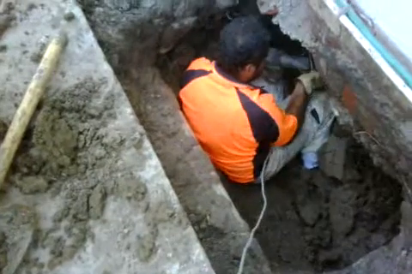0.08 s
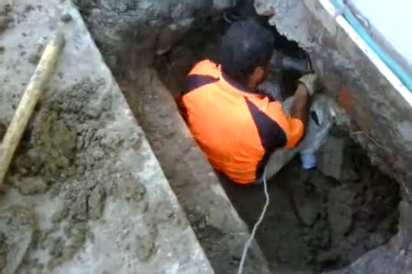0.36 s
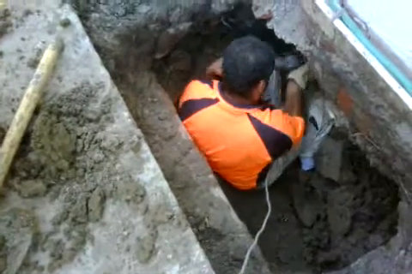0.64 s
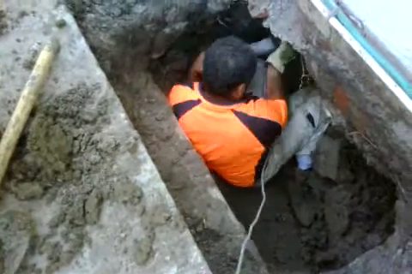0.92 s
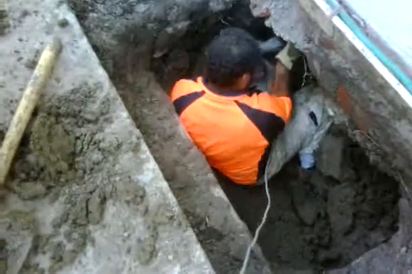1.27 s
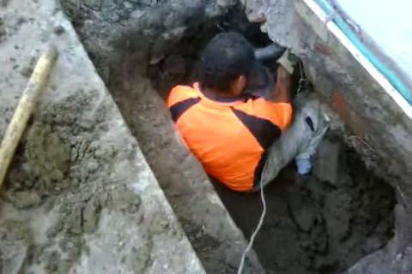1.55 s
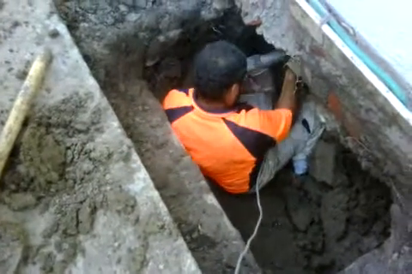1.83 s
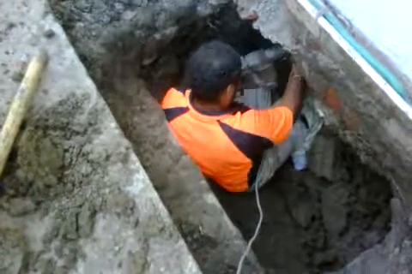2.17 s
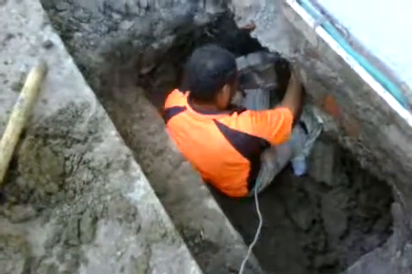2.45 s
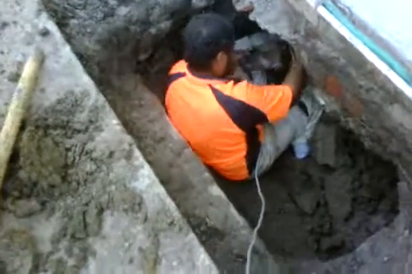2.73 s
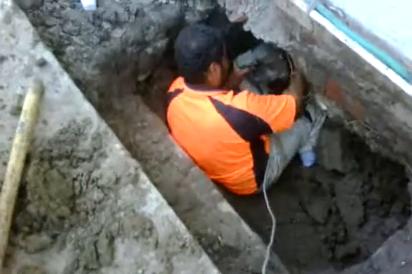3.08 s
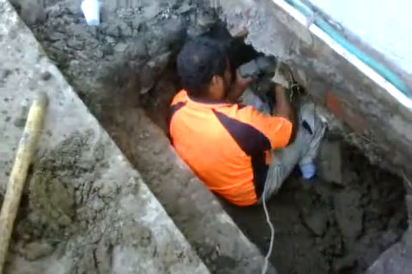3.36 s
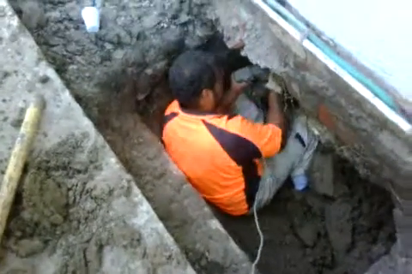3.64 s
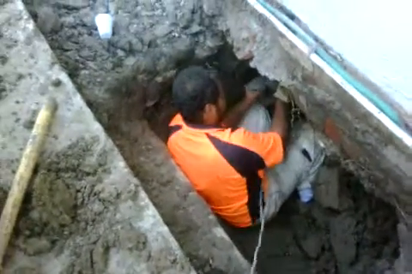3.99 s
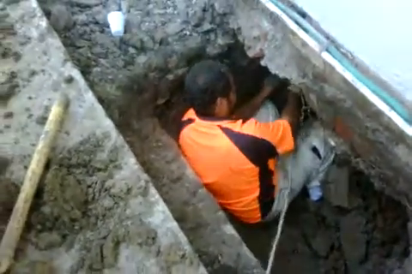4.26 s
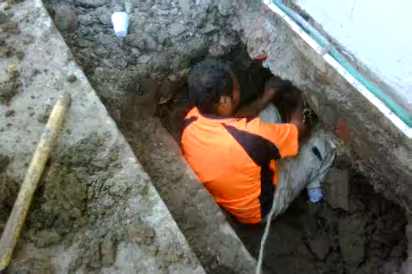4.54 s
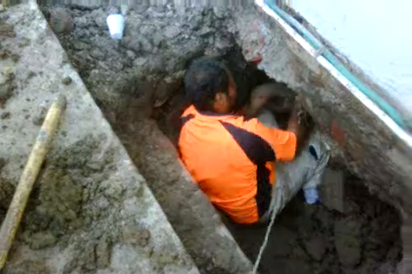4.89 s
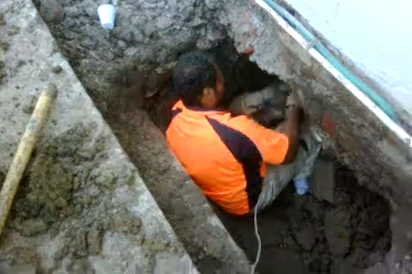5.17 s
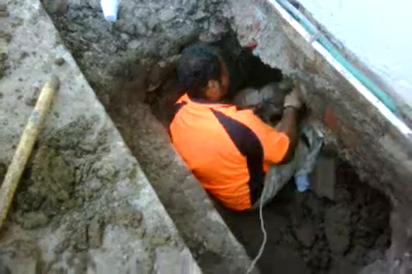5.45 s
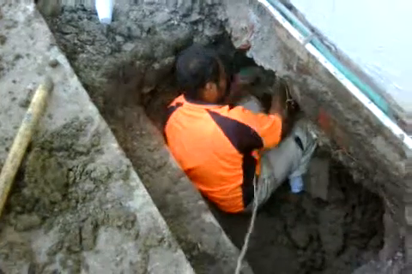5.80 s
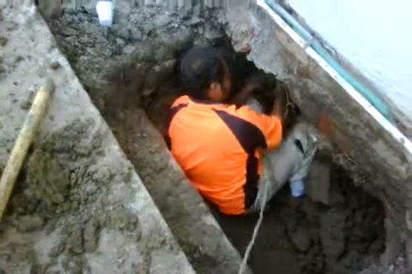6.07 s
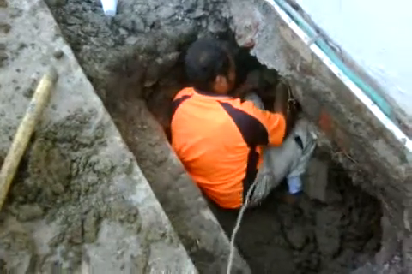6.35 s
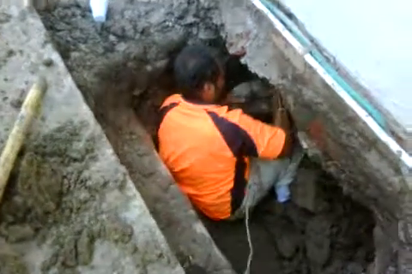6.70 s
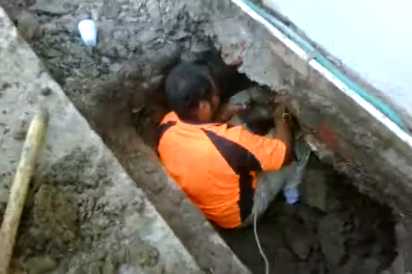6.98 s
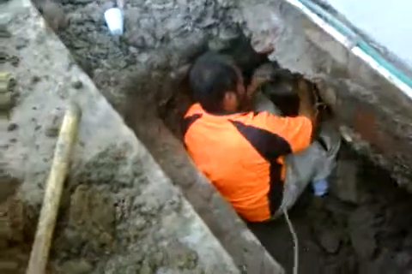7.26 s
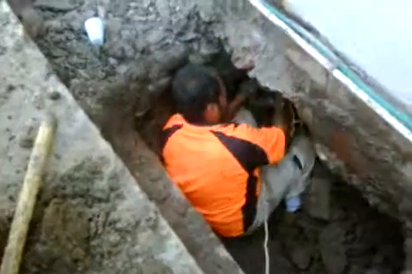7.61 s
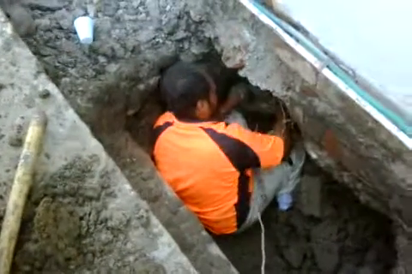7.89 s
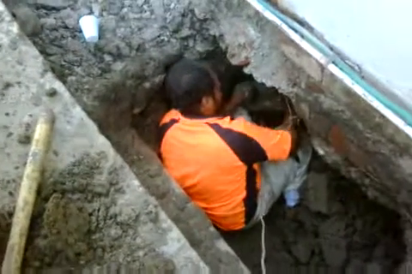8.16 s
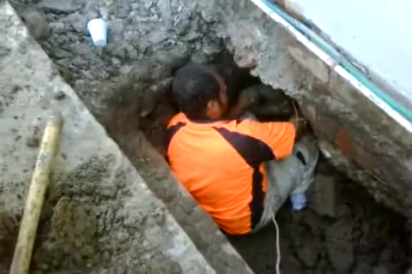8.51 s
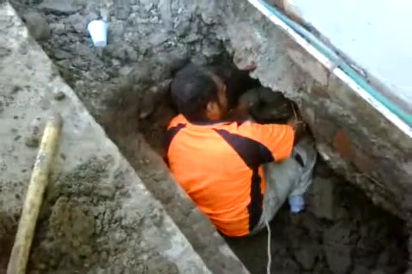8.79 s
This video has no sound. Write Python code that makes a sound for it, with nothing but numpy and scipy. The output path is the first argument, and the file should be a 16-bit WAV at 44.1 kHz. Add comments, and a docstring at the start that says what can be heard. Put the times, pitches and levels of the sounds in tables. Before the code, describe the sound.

An electric breaker's motor winds down and its loose chisel clanks and scrapes in bursts, before rapid, continuous hammering chips away stone.

```python
"""A corded breaker hammer pounds masonry in a narrow pit, heard from above.
First its motor whines and runs down, the chisel is shifted with a clatter, then it skitters over the
stone in short bursts. After another run-down and more clatter the worker leans in: the striker, a
weight inside the tool, hits about 22 times a second, ringing the chisel and crumbling the stone."""
import sys
import numpy as np
from scipy import signal
from scipy.fft import rfft, irfft
from scipy.io import wavfile
from scipy.ndimage import uniform_filter1d

SR = 44100
rng = np.random.default_rng(int(sys.argv[2]) if len(sys.argv) > 2 else 0)


def bounce(signal):
    """Save signal as a 16-bit WAV file at the path given by the first command-line argument."""
    frames = np.transpose(np.atleast_2d(signal))
    limited = np.clip(frames, -1, 1)
    pcm = np.round(limited * 32767).astype(np.int16)
    wavfile.write(sys.argv[1], SR, pcm)


N = 399105
TIME = np.arange(N) / SR

# pushes on the loose chisel: hardest moment t/s, level/dB, swell/s, fade/s, clack rate/Hz, bass/dB
PUSHES = [(1.591, -13, 0.052, 0.072, 35.4, -15.5), (1.774, -16, 0.059, 0.049, 54, -15),
          (1.874, -23.5, 0.043, 0.061, 50, -10), (1.9981, -14, 0.074, 0.063, 48, -19.5),
          (2.131, -14.5, 0.047, 0.056, 44.5, -16.5), (2.215, -24.5, 0.038, 0.093, 65, -5),
          (2.337, -14.5, 0.087, 0.064, 54.5, -17), (2.541, -14.5, 0.051, 0.048, 56, -19),
          (2.7455, -15, 0.062, 0.079, 54.6, -17), (2.922, -17, 0.033, 0.047, 46, -19),
          (3.1025, -15.5, .045, 0.028, 57, -18), (3.274, -15.5, 0.052, 0.084, 50, -13.5),
          (3.5532, -16.5, 0.1, 0.014, 46.5, -12.5)]


def amp(db):
    """Turns decibels into a gain."""
    return 10 ** (np.asarray(db) / 20)


def evened(x):
    """Scales a signal to an average power of one."""
    return x / np.sqrt(np.mean(x ** 2) + 1e-20)


def curve(rows, **ends):
    """Joins (time, value) points with straight lines."""
    return np.interp(TIME, *np.transpose(rows), **ends)


def drift(hz):
    """A smooth random wobble; a higher hz makes it quicker."""
    keep_slow = np.exp(-(np.fft.rfftfreq(N, 1 / SR) / hz) ** 2)
    return evened(irfft(rfft(rng.standard_normal(N)) * keep_slow, N))


def colour(x, spectrum, modes=(), size=8192):
    """Gives a sound a broad tone colour plus modes, the pitches at which an object likes to ring."""
    hz = np.fft.rfftfreq(size, 1 / SR) + 1
    f, db = np.transpose(spectrum)
    power = evened(amp(np.interp(np.log(hz), np.log(f), db))) ** 2
    for centre, width, mode_db in modes:
        power += evened(1 / (1 + ((hz - centre) / width) ** 2)) ** 2 * amp(mode_db) ** 2
    log_gain = np.log(evened(np.sqrt(power)) + 1e-5)
    mirrored = np.concatenate([log_gain, log_gain[-2:0:-1]])
    response = np.exp(np.conj(signal.hilbert(mirrored)))  # rings after a hit, never before it
    taps = np.fft.ifft(response).real[:size // 2]
    return signal.oaconvolve(x, taps)[:N]


def shifting(x, depth_db, width_hz, hold_s, size=1024):
    """Random bands of pitch swell and sink, as when a wandering contact wakes different resonances."""
    frames = dict(nperseg=size, noverlap=size * 3 // 4)
    hz, t, spectra = signal.stft(x, SR, **frames)
    across, along = np.fft.fftfreq(len(hz), hz[1])[:, None], np.fft.fftfreq(len(t), t[1])
    smooth = np.exp(-(across * width_hz) ** 2 - (along * hold_s) ** 2)
    patches = evened(np.fft.ifft2(np.fft.fft2(rng.standard_normal(spectra.shape)) * smooth).real)
    gain = evened(amp(depth_db * np.clip(patches, -2, 2)))
    return signal.istft(spectra * gain, SR, **frames)[1][:N]


def hit_shape(t, rise_s, decay_s):
    """The loudness of one hit: it swells quickly and dies away."""
    return (1 - np.exp(-t / rise_s)) * np.exp(-t / decay_s)


def strikes(times, levels_db, decays, rise_s):
    """One burst of noise for each hit."""
    power, t = np.zeros(N), TIME[:SR // 2]
    for start, db, decay in zip(times, levels_db, np.broadcast_to(decays, len(times))):
        part = power[round(start * SR):][:len(t)]
        part += (amp(db) * hit_shape(t[:len(part)], rise_s, decay)) ** 2
    return np.sqrt(power) * rng.standard_normal(N)


def outdoor_air():
    """A faint, steady hush."""
    tone = [(20, -22), (60, -9), (200, -3.5), (700, 7), (2000, 0), (4400, -13)]  # colour of the air: f/Hz, level/dB
    return amp(-56.5) * colour(rng.standard_normal(N), tone)


def motor(spin_up_s=.09, whirr_db_per_octave=11, whine_db_per_octave=22.5):
    """Gears whine and the casing whirrs; both grow with the motor's speed and sink as it coasts."""
    # motor whine and whirr: swells from t/s, starts sinking t/s, top gear f/Hz, slowing/(Hz per s),
    # whirr/dB, whine/dB
    swells = [(-1, .42, 2850, 1550, -38.5, -39), (2.55, 3.9, 2400, 640, -35.5, -42.5),
              (7.5, 9.5, 3500, 900, -36.5, -60.5)]
    casing = [(35, -83), (60, -50.5), (220, -34), (500, -37), (754, -21.5), (796, -21), (934, -24),
              (1570, -16), (1910, -4), (2240, -9), (2530, -10), (2820, -20), (3030, -20.5), (3560, -18.5),
              (4250, -50.5), (5520, -78.5), (9350, -120)]  # colour of the casing: f/Hz, level/dB
    casing_modes = [(1387, 64, -13.5), (1940, 510, -3), (2580, 85, -8.5)]  # its resonances: f/Hz, width/Hz, level/dB
    pitch, whirr_db, whine_db = np.zeros((3, N))
    for swell_at, sink_at, top_hz, slowing, top_whirr_db, top_whine_db in swells:
        now = TIME >= swell_at
        t, start_hz = TIME[now], pitch[now][0]
        rising_hz = top_hz + (start_hz - top_hz) * np.exp((swell_at - t) / spin_up_s)
        pitch[now] = rising_hz - slowing * np.maximum(t - sink_at, 0)
        octaves = np.log2(np.maximum(pitch[now], 1) / top_hz)
        whirr_db[now] = top_whirr_db + whirr_db_per_octave * octaves
        whine_db[now] = top_whine_db + whine_db_per_octave * octaves
    cycles = np.cumsum(pitch * (1 + .012 * drift(150))) / SR
    flutter = .8 + .55 * drift(60)
    whine = np.sin(2 * np.pi * cycles) * flutter * amp(whine_db)
    whirr = rng.standard_normal(N) * amp(whirr_db + 2 * drift(250) + drift(12))
    return whine + shifting(colour(whirr, casing, casing_modes), depth_db=3.8, width_hz=250, hold_s=.08)


def clatter(stroke_s=.046, stroke_db=-12.5, rise_s=.0035):
    """As the tool is shifted, steel clanks on stone and the body bumps the soil."""
    # each contact: t/s, clank/dB, thud/dB, decay/s, ring f/Hz, ring/dB
    contacts = [(.545, -33.5, -44.5, .08, 1380, -42), (.591, -23.5, -32, 0.066, 2660, -31.5),
                (.634, -20.5, -39.5, .05, 1890, -27), (.7, -41, -32, 0.24, 473, -38),
                (.762, -21, -24.5, 0.026, 1113, -29), (.817, -20.5, -31, 0.02, 1480, -26.5),
                (.86, -28.5, -36, 0.033, 227, -30.5), (.926, -24, -32, 0.017, 1316, -17.5),
                (.935, -11.5, -40.5, 0.022, 1533, -21), (1.015, -19, -47, 0.02, 2640, -21),
                (1.103, -32.5, -56, 0.038, 2550, -33), (1.2, -41, -60, 0.037, 224, -46.5),
                (3.64, -37, -29.5, 0.019, 1446, -26.5), (3.712, -28.5, -43.5, 0.015, 1382, -24),
                (4.137, -17.5, -35, 0.043, 1840, -19), (4.152, -21.5, -36, 0.014, 2520, -17),
                (4.33, -37, -36, 0.03, 212, -35.5), (4.44, -45, -38, 0.013, 1390, -48),
                (4.875, -51.5, -47, 0.094, 1920, -34), (4.975, -34.5, -51, 0.036, 1730, -35)]
    clank_tone = [(290, -47.5), (500, -7), (587, -25), (768, -8.5), (1080, -10.5), (1160, -14), (1290, -14),
                  (1410, -5), (1500, -28), (1620, -3), (2250, -2.5), (2510, 0), (3190, -11), (3720, -12.5),
                  (4250, -30.5), (5520, -44.5), (9350, -120)]  # steel on stone: f/Hz, level/dB
    chisel_modes = [(1320, 210, -21), (1510, 110, -18.5), (1890, 81, -12), (2180, 53, -8), (2433, 22, -10),
                    (3130, 77, -24)]  # chisel resonances: f/Hz, width/Hz, level/dB
    thud_tone = [(18, -47.5), (30, -26), (113, -10.5), (210, -2), (502, -3), (611, 0.5), (743, -5),
                 (932, -10), (1100, 3), (1430, -24), (2420, -120)]  # body on soil: f/Hz, level/dB
    stroke_step = np.array([stroke_s, stroke_db, stroke_db, 0, 0, stroke_db])
    repeated = np.vstack([contacts + k * stroke_step for k in range(4)])  # a hit and three weaker repeats as the idle striker clatters at its stroke rate
    times, clank_db, thud_db, decays, ring_hz, ring_db = repeated.T
    clank = strikes(times, clank_db, decays, rise_s) * amp(2 * drift(300))
    thud = strikes(times, thud_db, decays, rise_s)
    ring, t = np.zeros(N), TIME[:SR // 4]
    ring_shape = hit_shape(t, rise_s=.00059, decay_s=.03)
    for start, hz, db in zip(times, ring_hz, ring_db):
        ring[round(start * SR):][:len(t)] += amp(db) * ring_shape * np.sin(2 * np.pi * hz * t)
    ring *= 1 + .8 * drift(120)
    return colour(clank, clank_tone, chisel_modes) + colour(thud, thud_tone) + ring


def push(t, swell, fade):
    """One push on the tool: a flat-topped bell shape, hardest at t = 0."""
    return np.exp(-abs(t / np.where(t < 0, swell, fade)) ** 2.6)


def clacking(uneven_db=5):
    """The loose chisel clacks in its holder at an even pace, about as hard as it is pushed."""
    times, levels_db = [], []
    for peak, db, swell, fade, rate, _ in PUSHES:
        t = np.arange(-4, 5) / rate
        push_db = db + 20 * np.log10(push(t, swell, fade) + 1e-6)
        times.extend(peak + t)
        levels_db.extend(push_db - uneven_db * rng.random(len(t)) ** 2)
    return strikes(times, levels_db, decays=.006, rise_s=.00098)


def skitter(buzz_hz=50):
    """The unloaded chisel scrapes and buzzes over the stone, clacking with each push."""
    slide_levels = [(1.365, -59), (1.395, -25.5), (1.5, -18.5), (2.25, -23), (2.45, -29), (3.2, -24),
                    (3.6, -27), (3.85, -31.5), (4.12, -35)]  # the tip sliding lightly: t/s, level/dB
    steel_tone = [(410, -41.5), (700, -24), (858, -36.5), (968, -10.5), (1050, -5.5), (1350, -0.5),
                  (1500, -3), (1670, 0), (2060, 2.5), (2580, -1), (3100, -11.5), (3490, -13), (4250, -37),
                  (5520, -60), (9350, -120)]  # scraped steel: f/Hz, level/dB
    steel_modes = [(2586, 24, -16.5)]  # the sliding chisel sings: f/Hz, width/Hz, level/dB
    stone_tone = [(18, -49), (30, -29), (117, -19), (214, -19), (427, -13.5), (598, -9), (851, -2.5),
                  (1000, -0.5), (1300, -14.5), (2200, -120)]  # the low part of the scrape: f/Hz, level/dB
    hit_times = [1.633, 2.019, 2.340, 2.748, 3.103, 3.552]  # sharp, head-on hits of steel on steel: t/s
    sliding = amp(curve(slide_levels, left=-120, right=-120))
    push_power = np.array([amp(db) * push(TIME - peak, swell, fade)
                           for peak, db, swell, fade, _, _ in PUSHES]) ** 2
    force = np.sqrt(sliding ** 2 + push_power.sum(0))
    bass_shares = amp(np.transpose(PUSHES)[-1]) ** 2
    bass = np.sqrt((sliding * amp(-22)) ** 2 + bass_shares @ push_power)
    cycles = np.cumsum(buzz_hz * (1 + .051 * drift(7.1))) / SR
    buzz = 1 + .1 * np.cos(2 * np.pi * cycles)
    scrape = amp(-3.5 + 2.5 * drift(430)) * buzz * rng.standard_normal(N)
    clacks = clacking() * amp(9)
    steel = colour(scrape * force + clacks, steel_tone, steel_modes)
    steel = shifting(steel, depth_db=3.5, width_hz=160, hold_s=.046)
    stone = colour(scrape * bass + amp(-14) * clacks, stone_tone)
    clicks = np.bincount(np.round(np.array(hit_times) * SR).astype(int), minlength=N)
    return steel + stone + colour(clicks * amp(13), steel_tone)


def chips(width_hz=600):
    """Each big flake of stone snaps off with a short burst of noise around its own pitch."""
    flakes = [(5.377, -17, 2000, 0.0087), (5.575, -16, 1910, 0.0083), (5.618, -33, 1900, 0.01),
              (5.668, -25, 2000, 0.01), (6.135, -22, 2840, 0.046), (6.221, -26, 1630, .008),
              (6.368, -23, 2900, 0.0088), (6.634, -19, 1530, 0.0065), (7.04, -29.5, 3190, 0.045),
              (8.203, -19, 1440, .014), (8.382, -22.5, 2280, 0.018), (8.565, -23, 2300, 0.015),
              (8.92, -24, 2170, .012)]  # flakes cracking off: t/s, level/dB, f/Hz, decay/s
    snaps, t = np.zeros(N), TIME[:SR // 9]
    pole = np.exp(-np.pi * width_hz / SR)
    for start, db, hz, decay in flakes:
        band = [1, 0, -1, 1, -2 * pole * np.cos(2 * np.pi * hz / SR), pole ** 2]
        snap = evened(signal.sosfilt([band, band], rng.standard_normal(len(t))))
        snaps[round(start * SR):][:len(t)] += amp(db) * snap * hit_shape(t, .0022, decay)
    return snaps


def blows(age, period, decay, alike, lead_s, rattle):
    """Blows repeat a slowly changing pattern of pit echoes (the share `alike`), plus fresh debris."""
    patterns = rng.standard_normal((3, SR))[:, np.minimum(age * SR, SR - 1).astype(int)]
    weights = np.array([drift(1.7) for _ in patterns])
    echoes = (patterns * weights).sum(0) / np.linalg.norm(weights, axis=0)
    # the sound swells as the striker flies in, dies after the blow, and never stops rattling
    shape = np.maximum(np.exp((age - period) / lead_s), np.exp(-age / decay)) + rattle
    shape /= np.sqrt(uniform_filter1d(shape ** 2, size=8000) + 1e-9)
    return shape * (np.sqrt(alike) * echoes + np.sqrt(1 - alike) * rng.standard_normal(N))


def crumbling(crunch, force_db):
    """Stone breaks into grit under the tip; grinding needs both force and loose stone."""
    amount = [(5.26, -32.5), (5.4, -25.5), (5.6, -22.5), (5.85, -23), (5.98, -29.5), (6.3, -27.5),
              (6.7, -32.5), (7.06, -29), (7.2, -31), (8.1, -36.5), (8.4, -32.5), (8.6, -34.5),
              (9.05, -33.5)]  # how much stone crumbles: t/s, level/dB
    grind_tone = [(800, -32.5), (1150, -1), (1350, -1.5), (1580, 3), (1780, 1), (2200, -37)]  # stone being ground: f/Hz, level/dB
    grit_tone = [(1030, -28), (1750, 0.5), (1850, 0.5), (2080, 2), (2200, 0.5), (2440, -2.5), (3310, -12),
                 (3830, -21.5), (4250, -43), (5520, -72.5), (9350, -120)]  # loose grit: f/Hz, level/dB
    grit_db = curve(amount)
    grind = colour(crunch * amp((force_db + grit_db) / 2 - 3), grind_tone)
    grit = colour(crunch * amp(grit_db), grit_tone)
    return shifting(grind + grit, depth_db=4, width_hz=80, hold_s=.041)


def hammer(loose_decay_s=.09, firm_decay_s=.01, knock_hz=915, knock_s=.0045, uneven_db=1.26):
    """The striker drives the ringing chisel into the wall; as the tip beds in, blows stand apart."""
    pace = [(5.261, 16.33), (5.6, 22.31), (5.8, 19.9), (6.2, 23.37), (6.7, 20.28), (6.8, 22.15),
            (6.9, 20.18), (7.3, 22.08), (7.7, 21.47), (7.8, 23.46), (7.9, 21.71), (9.05, 23.06)]  # steady hammering: t/s, blow rate/Hz
    # stumbling thumps before and just as the hammering starts: t/s, level/dB, decay/s
    stumbles = [(4.937, -23, 0.029), (4.959, -27, 0.03), (5.18, -26.5, 0.053), (5.227, -30, 0.044),
                (5.318, -12.5, 0.012), (5.379, -19, 0.077)]
    wall_force = [(5.26, -25.5), (5.41, -19), (5.51, -22), (5.6, -18), (5.82, -18), (6.05, -20.5),
                  (6.29, -16.5), (6.72, -20.5), (6.96, -21.5), (7.05, -18), (7.15, -21.5), (7.38, -20),
                  (7.7, -24.5), (8.02, -27.5), (8.14, -22.5), (8.3, -30.5), (9.05, -30)]  # how hard blows reach the wall: t/s, level/dB
    bedding = [(5.26, 0.21), (5.9, .03), (6.5, 0.25), (7.0, 0.44), (7.25, 0.69), (7.7, 0.46), (8.25, 0.61),
               (9.05, 0.53)]  # how firmly the tip sits: t/s, firmness (0 loose, 1 firm)
    body_tone = [(25, -34), (70, -11.5), (150, -9), (225, -4), (300, -2.5), (450, -1), (800, -23),
                 (1500, -69.5)]  # the shaking tool: f/Hz, level/dB
    ring_tone = [(450, -36), (650, -29.5), (800, -6.5), (900, 6), (980, -8.5), (1080, 2.5), (1400, -38.5)]  # the ringing chisel: f/Hz, level/dB
    wall_tone = [(25, -40.5), (70, -25), (150, -18), (215, -10.5), (310, -9.5), (390, -6), (480, -5.5),
                 (560, -7), (720, -0.5), (820, -8), (950, -10.5), (1300, -49)]  # the struck wall: f/Hz, level/dB
    wall_modes = [(222.2, 7.2, -14), (262, 5.1, -21.5), (354, 11, -19.5), (539.5, 23, -9.5),
                  (701, 16, -12.5), (757, 11, -6.5)]  # its resonances: f/Hz, width/Hz, level/dB
    period, force_db, firm = 1 / curve(pace), curve(wall_force), curve(bedding)
    decay = loose_decay_s * (firm_decay_s / loose_decay_s) ** firm
    rattle = .5 - .24 * firm  # a firm tip rattles less between blows
    running = TIME >= pace[0][0]
    strokes = np.cumsum(running / period) / SR
    landings = strokes - .19  # the striker lands a little way into its stroke
    age = landings % 1 * period  # seconds since the last blow
    # each blow gets its own random strength, pitch and crunch
    strength, detune, flake = rng.standard_normal((3, SR))[:, (strokes + .5).astype(int)]
    force = running * amp(uneven_db * strength)

    pound = force * blows(age, period, decay, alike=.8, lead_s=.007, rattle=rattle)
    body = colour(pound * amp(-38), body_tone)  # the tool shakes whatever the tip meets

    chatter = blows(age, period, decay, alike=.75, lead_s=.004, rattle=rattle / 2)
    # the chisel's main resonance swells and dies within a few cycles: a round knock
    from_blow = ((landings + .5) % 1 - .5) * period  # seconds from the nearest blow
    note = np.sin(2 * np.pi * knock_hz * (1 + .025 * detune) * from_blow)
    knock = evened(running * np.exp(-abs(from_blow) / knock_s) * note)
    knock *= 1 + .47 * drift(380)  # roughened by the stone
    knock *= (decay.min() / decay) ** .84  # the less the tip chatters, the clearer the knock
    chisel = force * amp(force_db - 4.5 + .5 * firm) * (colour(chatter, ring_tone) * amp(-6) + knock)

    thumps = strikes(*np.transpose(stumbles), rise_s=.0033)
    wall = colour(pound * amp(force_db) + thumps, wall_tone, wall_modes)
    wall = shifting(wall, depth_db=1, width_hz=70, hold_s=.15)

    crunch = force * blows(age, period, decay, alike=.56, lead_s=.018, rattle=2.2 * rattle)
    crunch *= amp(3 * drift(270) + flake)
    return body + wall + chisel + chips() + crumbling(crunch, force_db)


def scene():
    """The tool over faint outdoor air, in one channel."""
    return (outdoor_air() + motor() + clatter() + skitter() + hammer())[None]


def record(dry, edge_hz=4330, top_hz=15800):
    """Rounds loud peaks and cuts the treble; the very hardest peaks still clip with a bright crack."""
    def cut_above(x, hz):
        return signal.oaconvolve(x, signal.firwin(401, hz, window=("kaiser", 9), fs=SR)[None], "same")

    rounded = dry / (1 + (dry / .637) ** 6) ** (1 / 6)
    clipped = np.clip(cut_above(rounded, edge_hz), -.72, .72)
    return cut_above(clipped, top_hz)


dry = scene()
out = record(dry)
bounce(out)
```